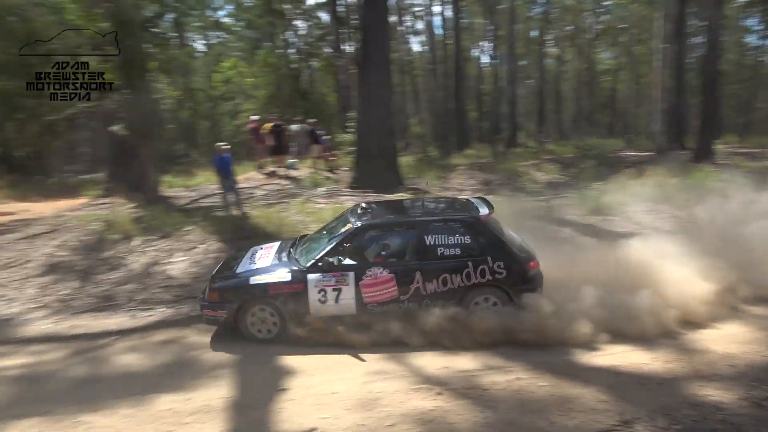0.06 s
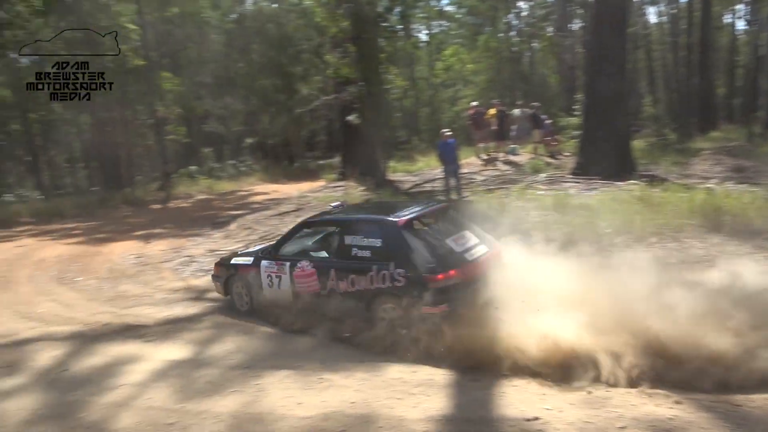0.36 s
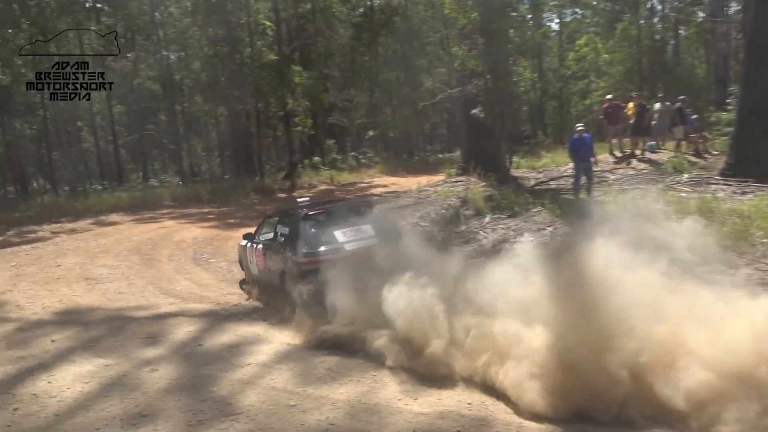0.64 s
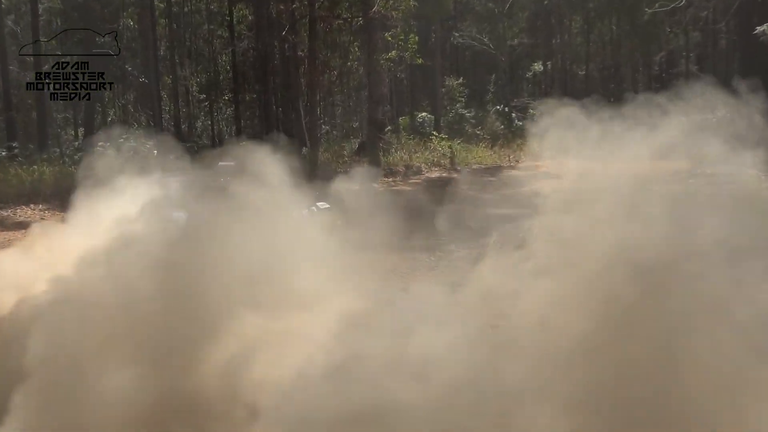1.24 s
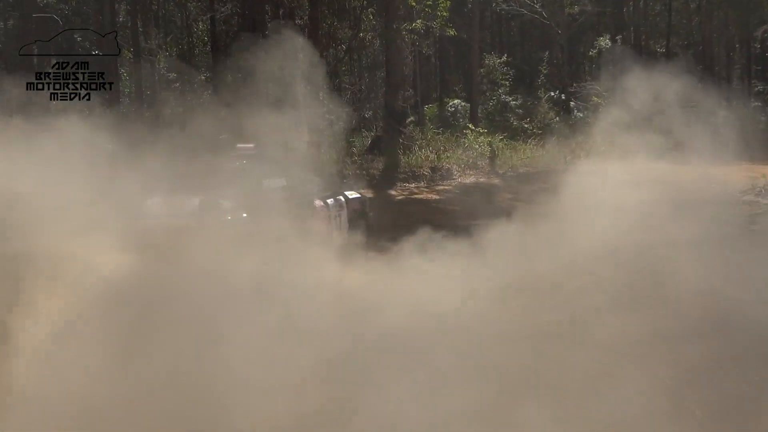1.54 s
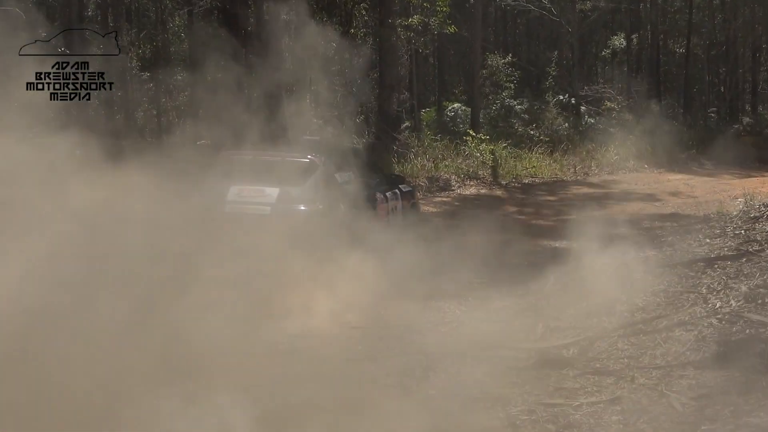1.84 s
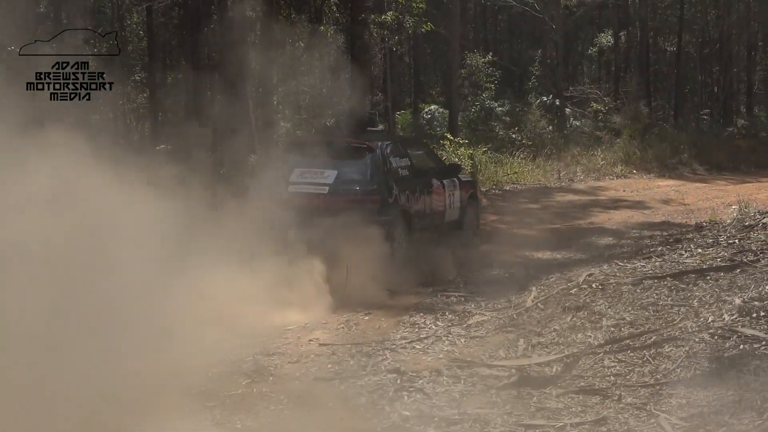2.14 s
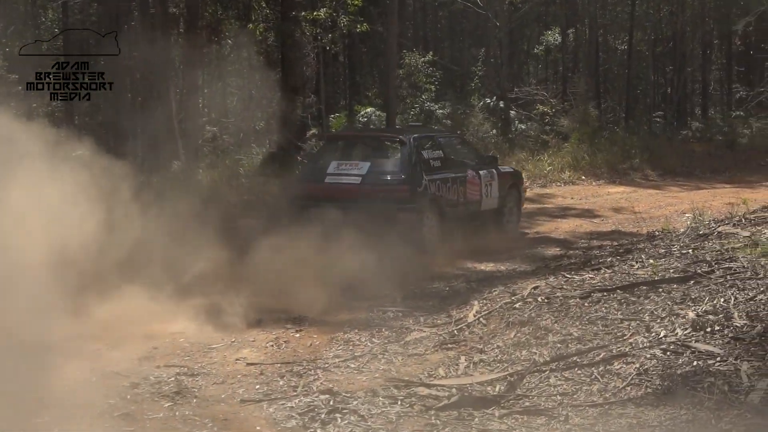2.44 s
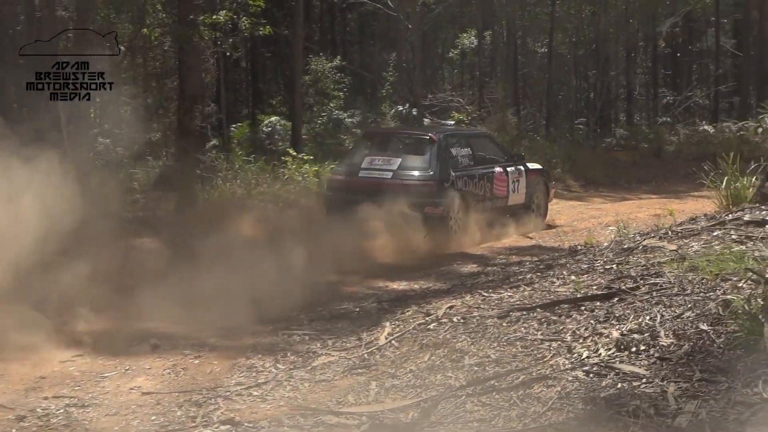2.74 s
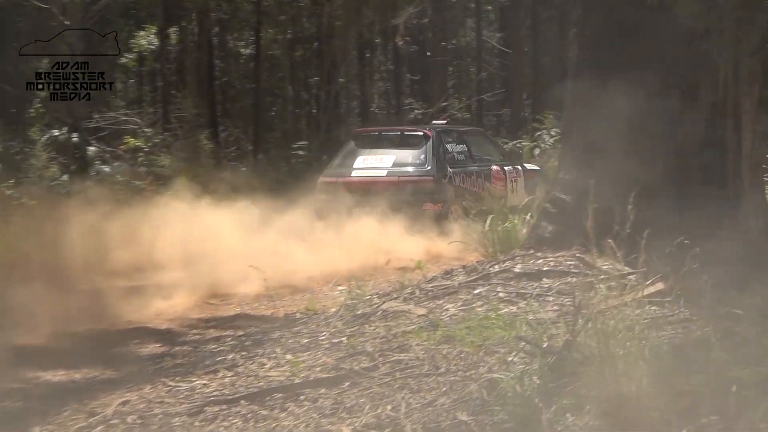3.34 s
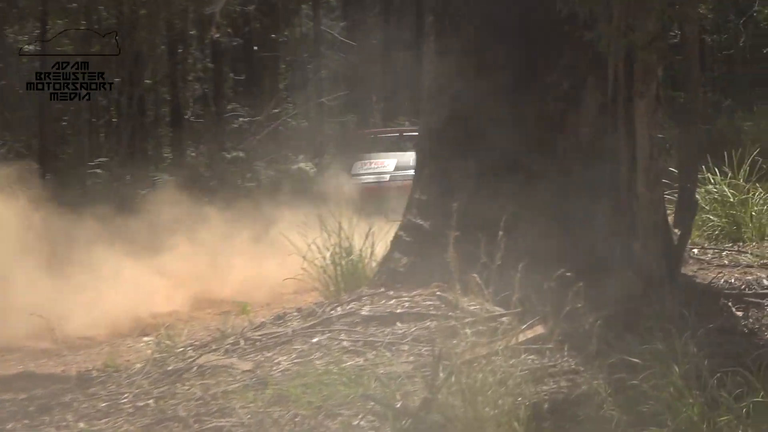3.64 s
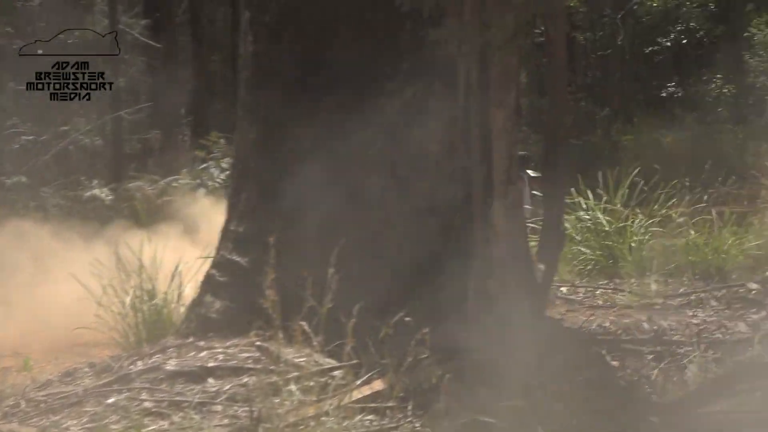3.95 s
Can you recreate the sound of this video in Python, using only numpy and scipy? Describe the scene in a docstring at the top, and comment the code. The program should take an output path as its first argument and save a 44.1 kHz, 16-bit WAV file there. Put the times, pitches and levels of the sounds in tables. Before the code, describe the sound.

A rally car slides past on loose gravel, then revs and drones away.

```python
"""A rally car slides past on loose dirt with the throttle shut: the engine burbles down while the
tyres churn gravel and fling stones, some knocking on the underbody. The exhaust pops on the overrun.
At 0.8 s the throttle opens and the revs flare with wheelspin, with a hoarse gargle and brief squeaks.
The engine bogs down near 2 s, then climbs steadily as the car drones away through the forest,
trailing a thin sizzle."""
import sys
import numpy as np
from scipy import signal
from scipy.fft import rfft, irfft, next_fast_len
from scipy.io import wavfile

SR = 44100
rng = np.random.default_rng(int(sys.argv[2]) if len(sys.argv) > 2 else 0)


def unload_audio(sound):
    """Save the sound as a 16-bit wav file, at the path given as the first command line argument."""
    columns = np.transpose(np.atleast_2d(sound))
    # keep every value between -1 and 1, then stretch to whole-number steps
    steps = np.round(np.clip(columns, -1, 1) * 32767)
    wavfile.write(sys.argv[1], SR, steps.astype(np.int16))


N = 176400
T = np.arange(N) / SR


def from_db(db):
    """Decibels to gain."""
    return 10 ** (np.asarray(db) / 20)


def unit_rms(x):
    """Scale to unit power."""
    return x / np.sqrt(np.mean(x ** 2) + 1e-20)


def in_time(rows):
    """The value columns of a time curve at every sample."""
    times_s, *columns = np.transpose(rows)
    return [np.interp(T, times_s, column) for column in columns]


def db_at(spectrum, hz):
    """Read a spectrum on a log-frequency axis."""
    points_hz, db = np.transpose(spectrum)
    return np.interp(np.log(hz + 1), np.log(points_hz), db)


def colour(x, spectrum):
    """Filter by a spectrum table."""
    size = next_fast_len(N + SR // 2)
    gain = from_db(db_at(spectrum, np.fft.rfftfreq(size, 1 / SR)))
    return irfft(rfft(x, size) * gain, size)[..., :N]


def drift(rate_hz):
    """Smooth random motion of unit RMS."""
    hop, settle = 40, 2000
    r = np.exp(-2 * np.pi * rate_hz * hop / SR)
    slow = signal.lfilter([1], [1, -2 * r, r * r], rng.standard_normal(N // hop + settle + 2))[settle:]
    return np.interp(np.arange(N) / hop, np.arange(len(slow)), unit_rms(slow))


def noise_layer(source, spectrum, levels, side_db=-38.5):
    """Widen a noisy source slightly, colour it and set its level over time."""
    wide = source + from_db(side_db) * rng.standard_normal(N) * [[1], [-1]]
    return unit_rms(colour(wide, spectrum)) * from_db(in_time(levels)[0])


def strike(hits, modes, spread_db=0):
    """Impulses ring damped modes of alternating sign."""
    start_s, db = np.transpose(hits)
    out = np.zeros(N)
    for k, (hz, mode_db, t60_s) in enumerate(modes):
        strengths = from_db(db + mode_db + spread_db * rng.standard_normal(len(start_s)))
        impulses = np.full(N, 1e-18)
        impulses[(start_s * SR).astype(int)] = strengths
        r = np.exp(-np.log(1000) / (t60_s * SR))
        w = 2 * np.pi * hz / SR
        out -= (-1) ** k * signal.lfilter([0, np.sin(w)], [1, -2 * r * np.cos(w), r * r], impulses)
    return out


# Ring of the exhaust. Each row: frequency in Hz, gain in dB, T60 in seconds.
EXHAUST_MODES = [(93.6, 11.5, 0.021), (195.6, 10.5, 0.019), (333.5, -0.5, 0.023), (500, -22.5, 0.017)]

def order(k, firing_hz, phase, scatter_rad=0, width_hz=28):
    """A tone at k times the firing rate, lagging as it passes the two lowest exhaust modes."""
    lag = sum(np.arctan((k * firing_hz - mode[0]) / width_hz) for mode in EXHAUST_MODES[:2])
    return -np.sqrt(2) * np.sin(k * phase + scatter_rad - lag)


# Exhaust boom off the throttle. Each row: time in seconds, level in dB.
COAST_BOOM = [(0, -10), (.15, -13.5), (.18, -20), (.22, -43), (.27, -17), (.32, -23.5), (.36, -17),
              (.49, -15), (.55, -24.5), (.69, -30.5), (.735, -12.5), (.79, -26)]
# Burble. Each row: multiple of the firing rate, level in dB.
COAST_ORDERS = [(0.504, -29), (0.75, -47.5), (1.251, -40), (1.499, -25.5), (1.997, -46.5), (2.5, -38),
                (4, -33)]

def coast(firing_hz, phase):
    """Throttle shut: a boom near the firing rate, and the burble of uneven firings."""
    out = from_db(in_time(COAST_BOOM)[0]) * order(0.98, firing_hz, phase)
    for k, db in COAST_ORDERS:
        out += from_db(db + 1.6 * drift(2.7)) * order(k, firing_hz, phase)
    return out


# Gas rasp and silencer gargle. Each row: time in seconds, level in dB.
RASP_LEVELS = [(.8, -33), (1.0, -39.5), (1.15, -42), (1.35, -37.5), (1.55, -36.5), (1.78, -34.5),
               (1.9, -30.5), (1.971, -37), (2.06, -45.5), (2.17, -31), (2.301, -38), (2.431, -31),
               (2.519, -39.5), (2.701, -33.5), (3.0, -39.5), (3.4, -37.5), (3.75, -46.5), (4, -47.5)]
GARGLE_LEVELS = [(.8, -48), (.9, -32), (1.05, -29), (1.15, -38), (1.33, -23), (1.45, -28.5), (1.6, -32.5),
                 (1.78, -40.5), (1.9, -30.5), (2.0, -38.5), (2.2, -41.5), (2.43, -37.5), (2.6, -41),
                 (4, -49)]
# Their spectra. Each row: frequency in Hz, gain in dB.
RASP_COLOUR = [(120, 5), (300, 7), (550, 2), (760, -2.5), (1000, 2), (1500, -8), (2400, -10), (4000, -23),
               (7000, -29), (15000, -56.5)]
GARGLE_COLOUR = [(150, -18), (280, 8), (350, -7), (410, 1), (490, 8), (600, -9), (720, -22.5),
                 (1100, -44.5)]

def gas_puffs(phase, sharpness=0.87, lag_rad=0.48):
    """Each firing lets out a puff of gas that rasps, and gargles in the silencer."""
    puffs = np.exp(sharpness * np.cos(phase - lag_rad))
    uneven_puffs = puffs * from_db(2 * drift(36))
    rasp = noise_layer(unit_rms(uneven_puffs * rng.standard_normal(N)), RASP_COLOUR, RASP_LEVELS)
    gargle = noise_layer(unit_rms(puffs * rng.standard_normal(N)), GARGLE_COLOUR, GARGLE_LEVELS)
    return rasp + gargle


# Engine speed off and on the throttle. Each row: time in seconds, firing rate in Hz.
COAST_SPEED = [(0, 131.1), (.15, 117.6), (.25, 112.4), (.36, 101.4), (.48, 94.2), (.66, 90.58), (.78, 84.4)]
DRIVE_SPEED = [(0.82, 49.5), (0.93, 68.0), (0.99, 76.3), (1.05, 86.0), (1.14, 97.8), (1.3, 120.3),
               (1.38, 125.5), (1.43, 121.9), (1.55, 110.2), (1.8, 98.0), (1.88, 89.9), (1.96, 73.2),
               (2.03, 74.7), (2.12, 84.2), (2.32, 85.6), (2.53, 95.3), (2.65, 96.1), (2.94, 105.9),
               (3.1, 107.9), (3.18, 111.5), (3.55, 119.2), (3.63, 123.1), (3.8, 126.0), (4.0, 133.3)]
# Wander of the firing times. Each row: time in seconds, RMS wander in cycles.
JITTER = [(0, .02), (.8, .012), (1.1, .006), (1.4, .01), (1.7, .008), (1.9, .016), (2.1, .003),
          (2.35, .004), (2.47, .009), (2.8, .007), (4, .009)]
# Engine position. Each row: time in seconds, left minus right in dB.
ENGINE_PAN = [(0, -3), (.6, -1.5), (1.2, 1), (1.8, 0.5), (2.5, -1.5), (3.2, -0.6), (4, 0)]

def engine(throttle_at_s=0.805, opening_s=0.035):
    """Four cylinders fire into the exhaust, first coasting, then under load."""
    firing_hz, = in_time(list(COAST_SPEED) + list(DRIVE_SPEED))
    wander_cycles, = in_time(JITTER)
    phase = 2 * np.pi * (np.cumsum(firing_hz) / SR + wander_cycles * drift(36))
    throttle = np.clip((T - throttle_at_s) / opening_s, 0, 1)
    tones = throttle * drive(firing_hz, phase, wander_cycles) + (1 - throttle) * coast(firing_hz, phase)
    exhaust = tones + gas_puffs(phase) + overrun_pops()
    return exhaust * from_db(in_time(ENGINE_PAN)[0] * [[.5], [-.5]])


def gravel(hiss_db, flicker_db, flicker_hz, grains_per_s=2200, spread_db=2.5):
    """Small collisions of uneven size over a smooth hiss; the level flickers."""
    sizes = from_db(spread_db * np.minimum(rng.exponential(1, N), 5)) * rng.choice([-1, 1], N)
    grains = unit_rms(sizes * (rng.random(N) < grains_per_s / SR))
    hiss = from_db(hiss_db) * rng.standard_normal(N)
    return unit_rms((grains + hiss) * from_db(flicker_db * drift(flicker_hz)))


# Tyres sliding, tyres rolling and fine grit. Each row: time in seconds, level in dB.
SLIDE_LEVELS = [(0, -18.5), (.05, -21), (.1, -20), (.15, -18.5), (.24, -15.5), (.33, -18), (.45, -20),
                (.53, -22), (.6, -19.5), (.68, -26.5), (.78, -24), (.85, -33.5), (1.05, -60), (1.3, -52.5)]
ROLL_LEVELS = [(0, -54), (.9, -40), (1.08, -43.5), (1.35, -34.5), (1.551, -38.5), (1.75, -36.5),
               (2.02, -41), (2.4, -38.5), (2.602, -41.5), (2.851, -39), (3.3, -45), (3.7, -47), (4, -47.5)]
GRIT_LEVELS = [(0, -78), (.35, -45), (.6, -50), (.8, -48.5), (.93, -51.5), (1.1, -57.5), (1.42, -49),
               (1.6, -57.5), (1.9, -53), (2.08, -54), (2.2, -51), (2.35, -54), (2.55, -56.5), (2.8, -55.5),
               (3.299, -50.5), (3.55, -53.5), (4, -55.5)]
# Their spectra. Each row: frequency in Hz, gain in dB.
SLIDE_COLOUR = [(25, -15), (50, -6), (100, 7.5), (200, 1), (380, -1.5), (480, 2.5), (620, 2), (750, -9),
                (870, -3), (1020, -5), (1250, -12.5), (1550, -12), (2100, -17), (2850, -21.5),
                (3250, -21.5), (3450, -23.5), (3700, -25.5), (4700, -29.5), (6600, -34), (10000, -41),
                (15500, -50)]
ROLL_COLOUR = [(25, -7.5), (70, -3.5), (200, 13.5), (550, 5.5), (760, 5), (1000, 5.5), (1500, 3.5),
               (2400, -2), (3200, -9.5), (4500, -25), (8000, -38), (15000, -35)]
GRIT_COLOUR = [(1500, -5.5), (3500, 5), (4500, 6.5), (5200, 3.5), (6200, 5.5), (7700, 0), (9000, -3),
               (10500, -6), (12500, -20.5), (15500, -30)]

def tyres():
    """Tyres churn dirt in the slide, then roll away, spraying grit in both."""
    slide = noise_layer(gravel(hiss_db=7.5, flicker_db=1.4, flicker_hz=23), SLIDE_COLOUR, SLIDE_LEVELS)
    roll = noise_layer(gravel(hiss_db=3, flicker_db=2.3, flicker_hz=32), ROLL_COLOUR, ROLL_LEVELS)
    grit = noise_layer(gravel(hiss_db=-2.5, flicker_db=2, flicker_hz=22), GRIT_COLOUR, GRIT_LEVELS)
    return slide + roll + grit


# Pebble fall. Each row: time in seconds, level in dB.
PEBBLE_LEVELS = [(0, -71), (.17, -50), (.35, -58), (.65, -55), (.85, -52), (1.05, -61), (1.2, -61.5),
                 (1.42, -64), (1.6, -69.5), (1.85, -68), (2.05, -65), (2.25, -64.5), (2.5, -71.5), (4, -79)]
# Tick spectrum. Each row: frequency in Hz, gain in dB.
PEBBLE_COLOUR = [(1000, -15), (3000, -13), (6000, -5), (9000, 6), (11500, -4.5), (15000, -9)]

def pebbles(ticks_per_s=450, spread_db=2):
    """Pebbles pelt the ground nearby: bright ticks, each a little to the left or right."""
    sizes = from_db(-spread_db * np.minimum(rng.exponential(1, N), 3.5)) * rng.choice([-1, 1], N)
    ticks = sizes * (rng.random(N) < ticks_per_s / SR)
    pan = from_db(2 * rng.standard_normal(N) * [[1], [-1]])
    return unit_rms(colour(ticks * pan, PEBBLE_COLOUR)) * from_db(in_time(PEBBLE_LEVELS)[0])


# Forest hiss. Each row: frequency in Hz, gain in dB.
AIR_COLOUR = [(30, 8.5), (200, 11.5), (1000, 4.5), (3000, -2), (4400, 4.5), (5000, -9), (6000, -3.5),
              (8000, -5), (10500, -15.5), (12500, -21.5), (15500, -36)]

def forest_air(level_db=-76):
    """Steady, wide hiss of the forest."""
    wide = rng.standard_normal(N) + .5 * rng.standard_normal((2, N))
    return from_db(level_db) * unit_rms(colour(wide, AIR_COLOUR))


def forest_echo(x, gain_db=-26.5, t60_s=1, delay_s=0.025, band_hz=(600, 3500)):
    """Scatter from the trunks, different on each side; the bass passes them by."""
    age_s = np.arange(SR) / SR
    tail = rng.standard_normal((2, SR)) * np.exp(-np.log(1000) * age_s / t60_s) * (age_s > delay_s)
    trunks = signal.butter(2, band_hz, "band", fs=SR, output="sos")
    response = signal.sosfilt(trunks, unit_rms(tail) / np.sqrt(SR))
    return from_db(gain_db) * signal.fftconvolve(x, response, axes=1)[:, :N]


def stone_shower(start_s=0.044, end_s=0.8, stones_per_s=170, low_hz=2000, high_hz=10000):
    """The sliding tyres fling a dense run of small stones; returns rows for stone_clicks."""
    span_s = end_s - start_s
    when, size, pitch = rng.random((int(stones_per_s * span_s), 3)).T
    db = -29.5 + 4.5 * (2 * size - 1)
    hz = low_hz * (high_hz / low_hz) ** pitch
    return list(zip(start_s + when * span_s, db, hz))


# Single stone clicks. Each row: start in seconds, relative level in dB, pitch in Hz.
STONE_CLICKS = [(.167, -24, 6900), (.194, -28, 9500), (.218, -41, 8910), (0.229, -21, 5600),
                (0.315, -35, 7400), (.384, -29, 7500), (.33, -24, 6000), (.44, -41, 9000),
                (0.4734, -29, 5007), (0.602, -20.5, 6700), (.7996, -17.5, 4600), (0.8, -23.5, 8200),
                (0.8616, -37, 9000), (1.0188, -28.5, 7400), (1.056, -45, 11020), (1.2775, -34.5, 7945),
                (1.41, -36, 8940), (1.941, -33, 9900), (1.962, -31, 6880), (2.115, -37, 6987),
                (2.1887, -33, 6304), (2.201, -31.5, 7100), (2.178, -36, 6000), (2.271, -35, 7140),
                (2.7141, -31, 5400), (3.234, -37, 5900), (3.192, -47, 6400), (3.528, -38.5, 8005)]

def stone_clicks(gain_db=-7.5, decay_s=0.0029, relative_bandwidth=0.4):
    """Stones hit each other, singly and in the shower: short bursts of resonant noise."""
    out = np.zeros(N)
    age_s = np.arange(SR // 20) / SR
    for start_s, db, hz in list(STONE_CLICKS) + stone_shower():
        r = np.exp(-np.pi * relative_bandwidth * hz / SR)
        resonator = [1, -2 * r * np.cos(2 * np.pi * hz / SR), r * r]
        burst = unit_rms(signal.lfilter([1, 0, -1], resonator, rng.standard_normal(len(age_s))))
        start = int(start_s * SR)
        out[start:start + len(age_s)] += from_db(db + gain_db) * burst * np.exp(-age_s / decay_s)
    return out


# Hits on the underbody. Each row: start in seconds, relative level in dB.
KNOCKS = [(.084, -21.5), (.2294, -10.5), (.2315, -26), (.236, -18), (.258, -26), (.3152, -26), (.599, -24)]
# Its ring. Each row: frequency in Hz, gain in dB, T60 in seconds.
UNDERBODY_MODES = [(1050, -2, 0.034), (1477, 4.5, 0.028), (2326, 1.5, 0.029), (2850, -0.5, 0.016),
                   (3210, 5.5, 0.017), (3740, -1, 0.016), (4080, -1, 0.017), (6670, -3.5, 0.012)]

def underbody_knocks(gain_db=-9):
    """Larger stones ring the underbody."""
    return from_db(gain_db) * strike(KNOCKS, UNDERBODY_MODES)


# Exhaust pops. Each row: start in seconds, relative level in dB.
POPS = [(.547, -16.5), (.569, -15.5), (.589, -19.5), (.610, -15.5), (.630, -10), (.654, -11.5),
        (.674, -10.5), (.699, -21), (.720, -15.5), (.742, -16), (.765, -10), (.811, -12)]

def overrun_pops():
    """Pops on the overrun ring the exhaust's modes."""
    return strike(POPS, EXHAUST_MODES, spread_db=1)


# Orders under load. Each row: time in seconds, then level in dB of orders 1, 2, 3 and 4-7.
ORDER_LEVELS = [(.83, -19.5, -15, -22, -35.5), (.92, -21.5, -15, -18, -30.5),
                (.98, -18, -9.5, -25.5, -36.5), (1.05, -15, -18.5, -16, -32),
                (1.12, -14.5, -17, -18.5, -32), (1.2, -15.5, -13, -25, -39.5),
                (1.3, -13.5, -17.5, -20, -38), (1.38, -13.5, -16, -28.5, -31),
                (1.55, -15.5, -12.5, -22, -31), (1.7, -18, -13.5, -25, -28),
                (1.8, -17.5, -14.5, -18, -31.5), (1.88, -16.5, -18, -16.5, -27),
                (2.0, -20, -13.5, -17.5, -34), (2.15, -17.5, -17, -17, -29), (2.42, -16, -17.5, -18, -26),
                (2.52, -15, -16.5, -21, -31), (2.8, -18.5, -14, -20, -32), (2.95, -15.5, -12.5, -28, -26.5),
                (3.1, -19.5, -10.5, -30, -29), (3.25, -18, -11, -28.5, -28.5),
                (3.4, -18.5, -16, -25.5, -27.5), (3.55, -23.5, -18.5, -29.5, -28.5),
                (3.65, -16, -19.5, -44, -31.5), (3.75, -21.5, -22, -35.5, -36.5),
                (3.87, -17.5, -20.5, -41, -33.5), (4, -20, -19, -37.5, -35.5)]
# Buzz of orders 8-18. Each row: time in seconds, level in dB.
BUZZ_LEVELS = [(.8, -37.5), (1.1, -39), (1.35, -41), (1.75, -36.5), (2.04, -35), (2.15, -27), (2.42, -26.5),
               (2.55, -30), (2.85, -39), (3.1, -31), (3.45, -32.5), (3.75, -42), (4, -41)]
# Pipe resonances, applied to orders 4-18. Each row: frequency in Hz, gain in dB.
PIPE_RESPONSE = [(220, 6.5), (300, 11), (340, 1.5), (385, -2), (420, -1), (455, -6), (510, 1), (565, -8.5),
                 (632, -5), (670, -11.5), (750, -20.5), (860, -12.5), (940, -15.5), (1040, -14.5),
                 (1170, -31.5), (1350, -30.5), (1550, -25.5), (1750, -42.5), (2400, -40)]
# Unevenness of the firings. Each row: time in seconds, depth as a share of amplitude.
SPUTTER = [(.8, 0.11), (.98, 0.071), (1.1, .035), (1.35, .12), (1.6, .03), (1.8, .04), (1.9, 0.15),
           (2.02, 0.11), (2.4, 0.064), (2.6, 0.017), (4, 0.065)]

def drive(firing_hz, phase, wander_cycles, waver_db=2, half_order_db=-24.5, quarter_order_db=-32):
    """Throttle open: orders lock to the firings; the higher ones swell through the pipe's resonances."""
    *low_db, middle_db = in_time(ORDER_LEVELS)
    buzz_db, = in_time(BUZZ_LEVELS)
    out = sum(from_db(db) * order(k, firing_hz, phase) for k, db in enumerate(low_db, start=1))
    for k in range(4, 19):
        db = (middle_db if k < 8 else buzz_db) + db_at(PIPE_RESPONSE, k * firing_hz)
        gain = from_db(db + waver_db * drift(13))
        scatter_rad = 5 * k * wander_cycles * drift(50)
        out += gain * order(k, firing_hz, phase, scatter_rad)
    # Unequal cylinders add weak in-between orders, falling 4 dB per octave.
    for k in np.arange(5, 28) / 4:
        if k % 1:
            uneven_db = quarter_order_db if (2 * k) % 1 else half_order_db
            gain = from_db(low_db[0] + uneven_db - 4 * np.log2(k))
            out += gain * drift(3.26) * order(k, firing_hz, phase)
    return out * (1 + in_time(SPUTTER)[0] * drift(69))


# Squeaks and chirps. Each row: start and length in seconds, first, middle and last pitch in Hz,
# level in dB, unsteadiness as a share of pitch.
SQUEAKS = [(.961, .016, 7900, 7800, 7700, -41, .01), (1.207, .041, 8272, 8306, 8050, -52, .003),
           (1.212, .045, 4050, 4180, 3820, -56.5, .005), (1.225, .04, 7800, 5640, 4700, -50, .05),
           (2.44, .065, 930, 1020, 1250, -35, .015), (2.52, .085, 1240, 1205, 1080, -39, .008),
           (2.54, .065, 2380, 2310, 2150, -48, .005), (2.41, .1, 2290, 2320, 2300, -46, .025)]

def squeaks(flutter_db=1):
    """Brief unsteady tones, each gliding along a parabola in pitch."""
    out = np.zeros(N)
    for start_s, length_s, first_hz, middle_hz, last_hz, db, unsteadiness in SQUEAKS:
        progress = np.clip((T - start_s) / length_s, 0, 1)
        glide = np.polyfit([0, .5, 1], [first_hz, middle_hz, last_hz], 2)
        hz = np.polyval(glide, progress) * (1 + unsteadiness * drift(150))
        envelope = from_db(db + flutter_db * drift(50)) * np.sqrt(2 * np.abs(np.sin(np.pi * progress)))
        out += envelope * np.sin(2 * np.pi * np.cumsum(hz) / SR)
    return out


# High sizzle. Each row: time in seconds, level in dB.
SIZZLE_LEVELS = [(2.5, -83), (2.68, -57.5), (2.85, -60), (3.1, -62), (3.3, -61.5), (3.6, -68)]
# Its spectrum. Each row: frequency in Hz, gain in dB.
SIZZLE_COLOUR = [(5500, -18), (7200, -4), (7700, 0), (8200, -5), (9200, -25)]

def sizzle(flicker_db=2.8):
    """A thin, flickering band of high noise as the car pulls away."""
    noise = rng.standard_normal(N) * from_db(flicker_db * drift(18))
    return noise_layer(noise, SIZZLE_COLOUR, SIZZLE_LEVELS)


# Stereo balance. Each row: frequency in Hz, left minus right in dB.
BALANCE = [(30, -5), (90, 6), (180, 1.77), (350, -0.5), (650, -4), (1300, -1.5), (2800, -0.5), (6000, 0)]

def scene():
    """The car among the trees; the boom leans left, the middle range right."""
    car = engine() + tyres() + pebbles() + underbody_knocks() + stone_clicks() + squeaks() + sizzle()
    left, right = car + forest_air() + forest_echo(car)
    return np.array([colour(left, [(hz, db / 2) for hz, db in BALANCE]),
                     colour(right, [(hz, -db / 2) for hz, db in BALANCE])])


def record(dry, low_cut_hz=46, high_cut_hz=15750):
    """The microphone sheds the deepest bass; the top is cut steeply."""
    lean = colour(dry, [(low_cut_hz / 2, -14), (low_cut_hz, -3), (low_cut_hz * 1.46, 0)])
    return signal.sosfilt(signal.ellip(10, .1, 80, high_cut_hz, fs=SR, output="sos"), lean)


dry = scene()
out = record(dry)
unload_audio(out)
```